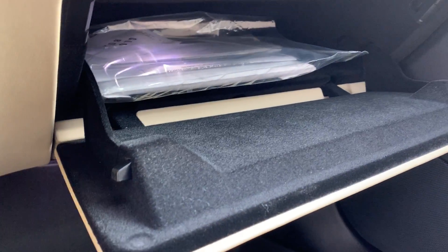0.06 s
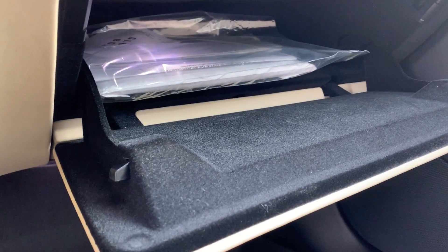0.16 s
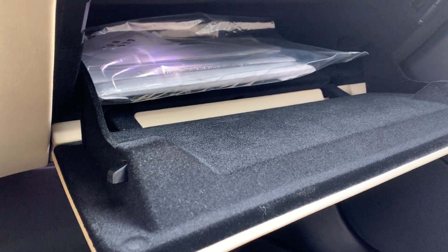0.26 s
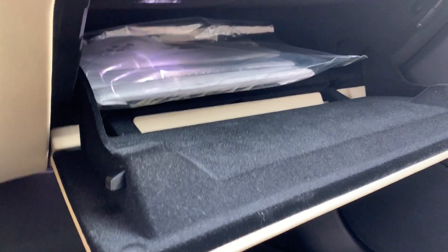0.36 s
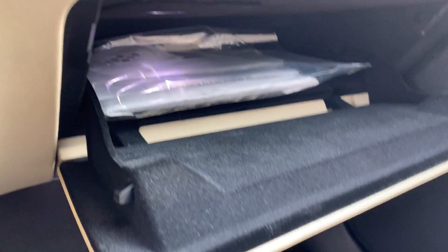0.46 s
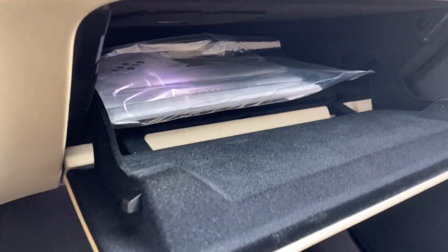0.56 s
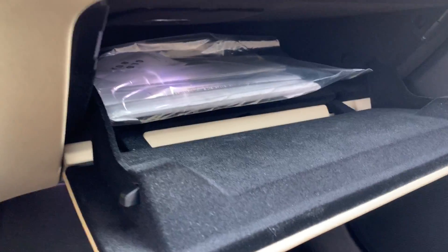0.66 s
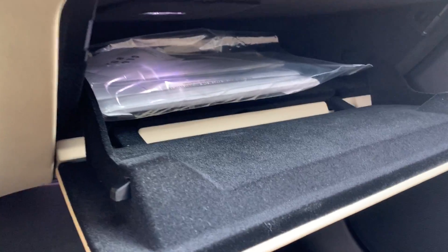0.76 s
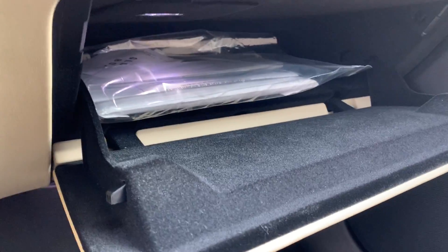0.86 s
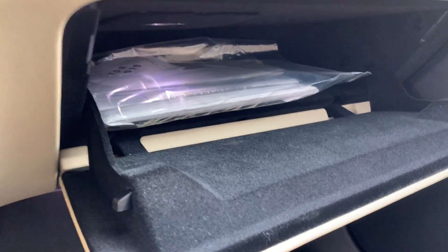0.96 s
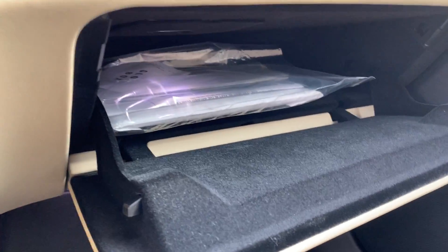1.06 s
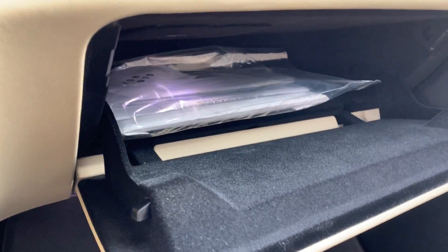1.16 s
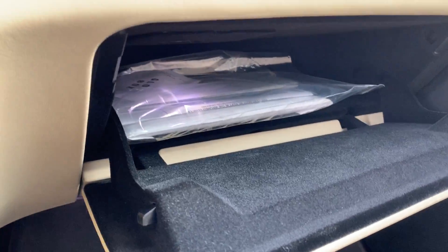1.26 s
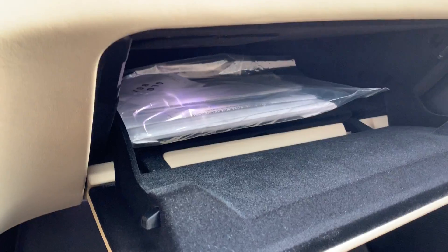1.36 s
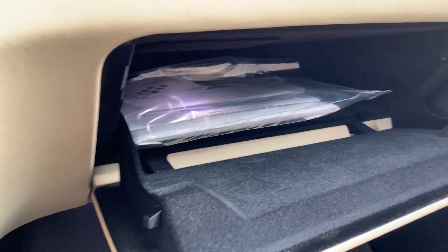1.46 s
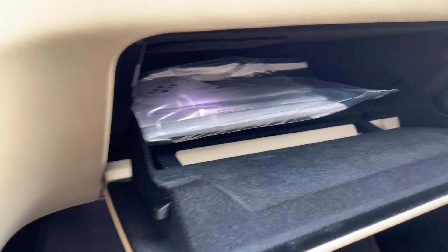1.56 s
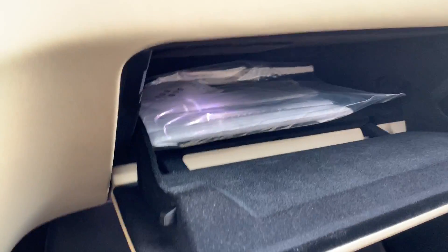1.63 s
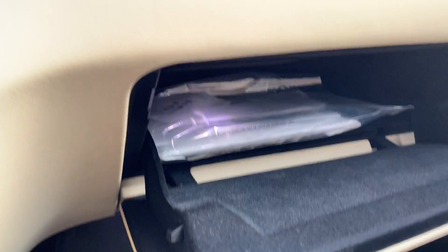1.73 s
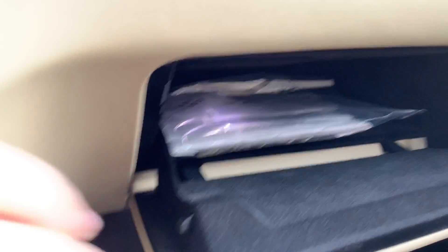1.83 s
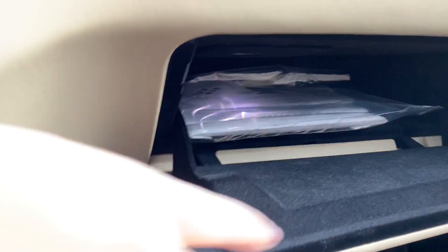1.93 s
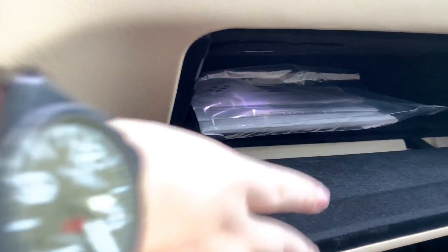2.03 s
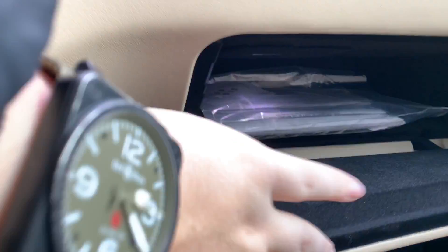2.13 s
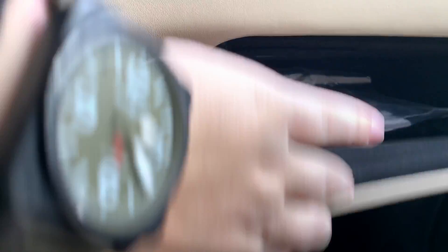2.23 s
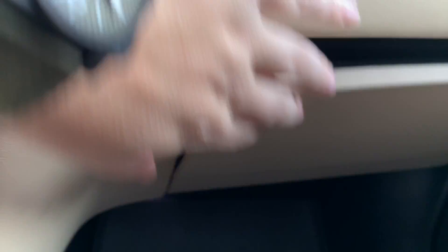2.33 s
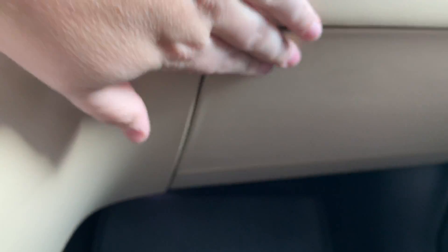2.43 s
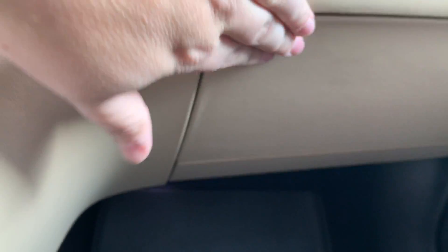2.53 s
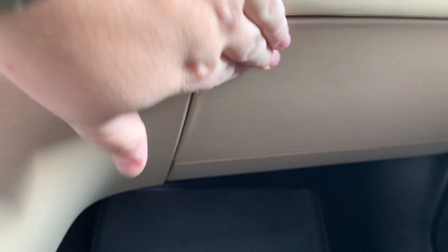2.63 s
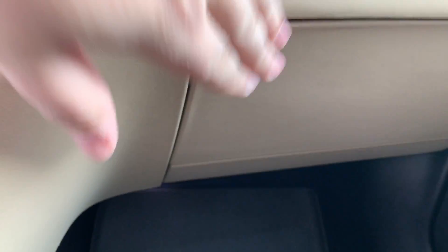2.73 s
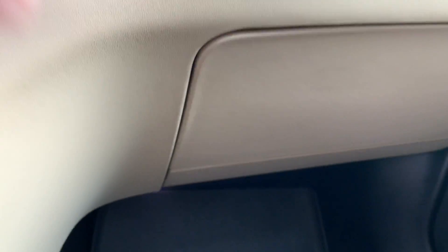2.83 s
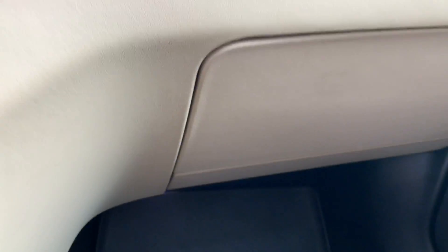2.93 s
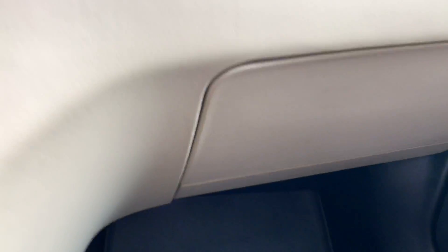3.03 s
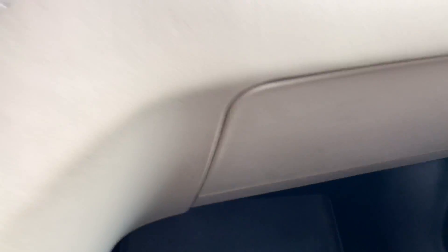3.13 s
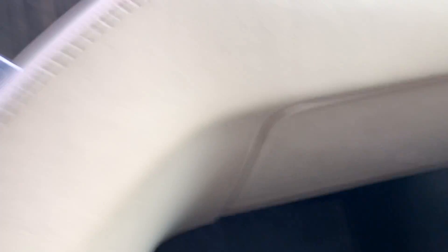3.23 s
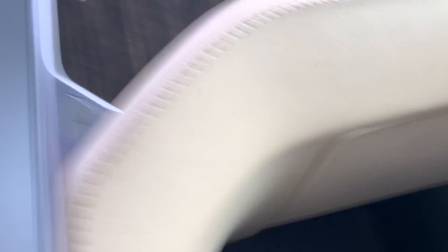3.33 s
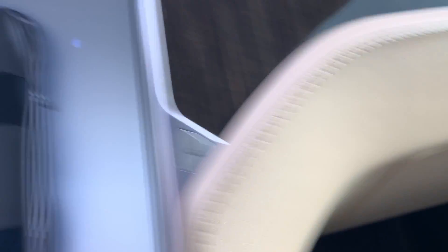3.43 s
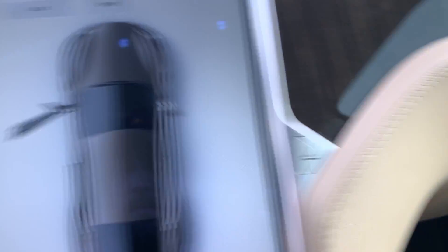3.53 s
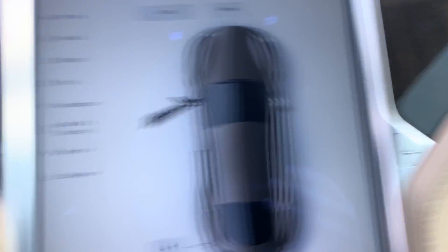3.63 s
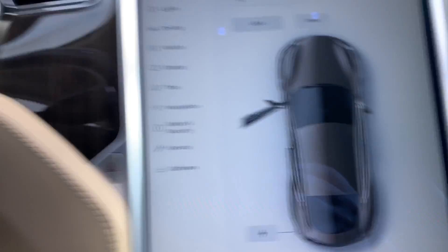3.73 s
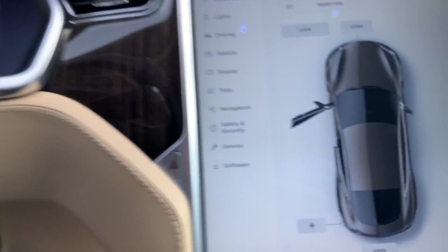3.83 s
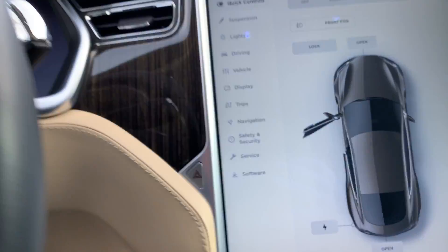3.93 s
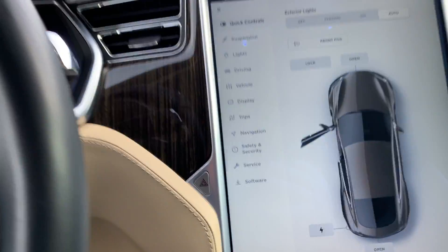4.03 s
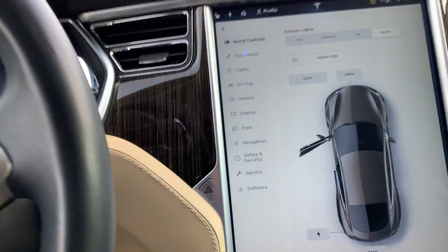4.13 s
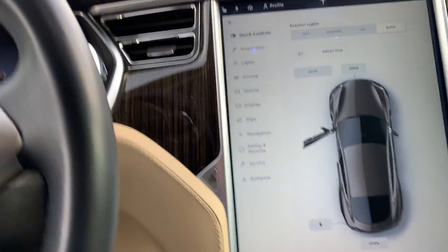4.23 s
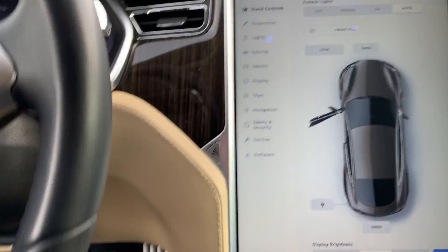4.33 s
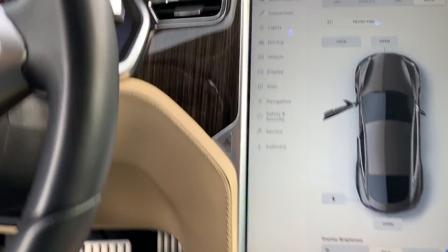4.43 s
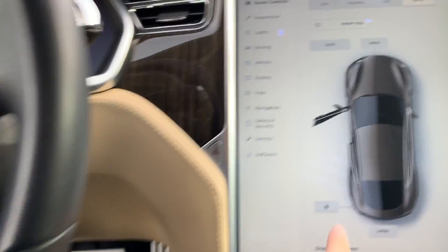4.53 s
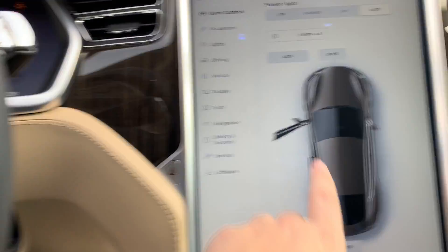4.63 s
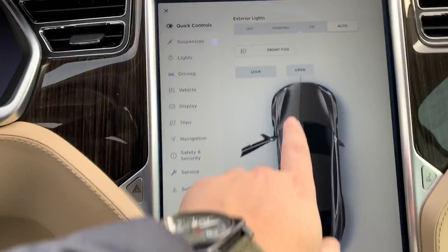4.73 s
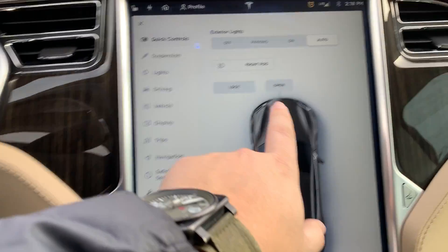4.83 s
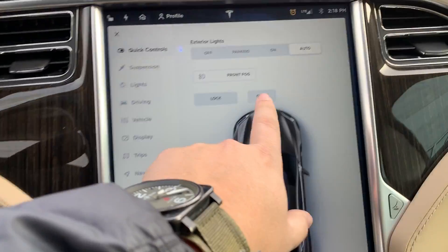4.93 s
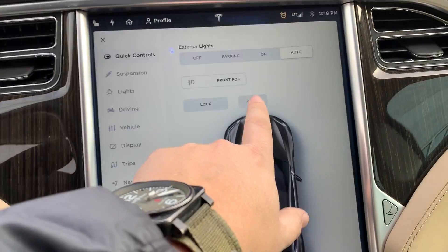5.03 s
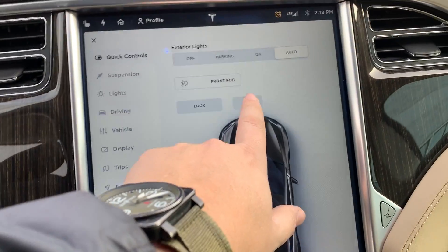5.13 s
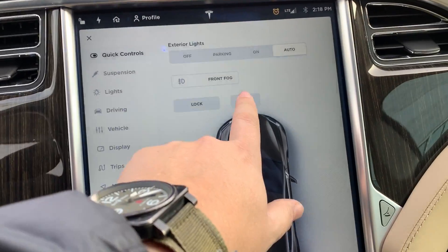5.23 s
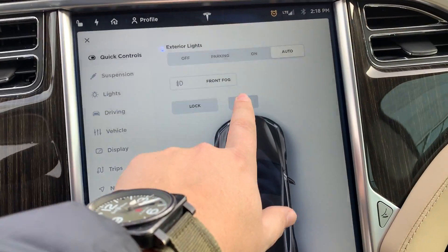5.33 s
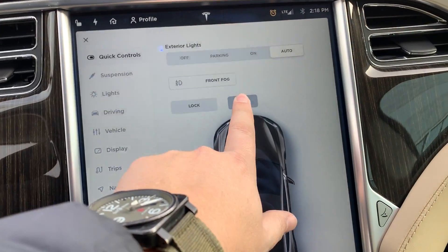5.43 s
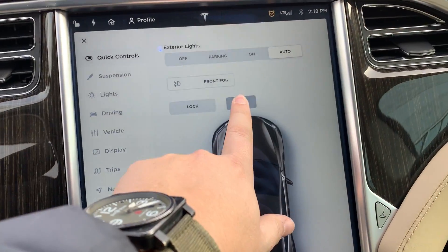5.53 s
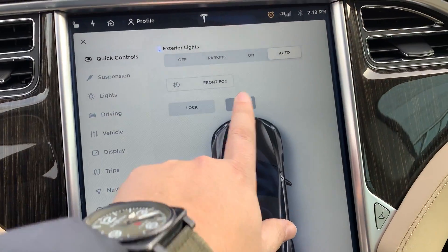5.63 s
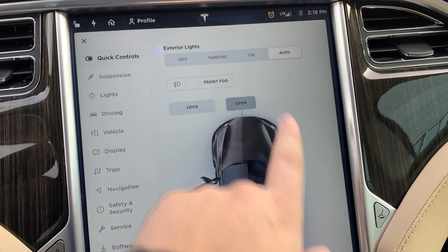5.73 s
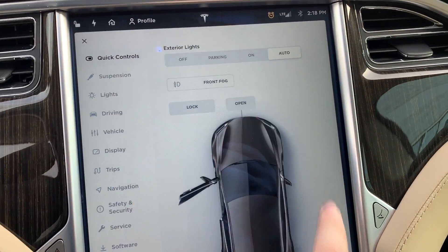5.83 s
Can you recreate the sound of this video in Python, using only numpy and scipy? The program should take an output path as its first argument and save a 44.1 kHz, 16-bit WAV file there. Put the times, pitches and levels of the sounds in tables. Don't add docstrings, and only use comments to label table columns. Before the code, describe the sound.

In a parked car, a faint low rumble and soft nylon sleeve rustles lead to a glovebox lid slamming and latching, then more cloth movement.

```python
import sys
import numpy as np
from scipy import signal
from scipy.fft import rfft, irfft
from scipy.io import wavfile
from scipy.ndimage import uniform_filter1d

SR = 44100
rng = np.random.default_rng(int(sys.argv[2]) if len(sys.argv) > 2 else 0)


def makeup_ratio(level_db):
    decades = np.asarray(level_db, float) / 20
    return 10 ** decades


def file_out(sig):
    cols = np.atleast_2d(sig).T
    lim = np.clip(cols, -1, 1)
    pcm = np.round(lim * 32767).astype(np.int16)
    wavfile.write(sys.argv[1], SR, pcm)


N = 259308
T = np.arange(N) / SR
HZ = np.fft.rfftfreq(N, 1 / SR)


def rms_one(x):
    return x / np.sqrt(np.mean(x ** 2) + 1e-20)


def at_hz(points, hz, column=1):
    p = np.array(points, float)
    return np.interp(np.log(hz + 1), np.log(p[:, 0]), p[:, column])


def colour(x, spectrum, size=16384):
    gain = rms_one(makeup_ratio(at_hz(spectrum, np.fft.rfftfreq(size, 1 / SR))))
    cepstrum = irfft(np.log(gain))
    cepstrum[1:size // 2] *= 2
    cepstrum[size // 2 + 1:] = 0
    response = irfft(np.exp(rfft(cepstrum)))
    return signal.fftconvolve(x, response[None], axes=1)[:, :N]


def cut(x, hz, kind, order=2):
    return signal.sosfilt(signal.butter(order, hz, kind, fs=SR, output="sos"), x)


def resonate(x, hz, width_hz):
    r = np.exp(-np.pi * width_hz / SR)
    poles = [1, -2 * r * np.cos(2 * np.pi * hz / SR), r * r]
    return signal.lfilter(np.array([1, 0, -1]) * (1 - r * r) / 2, poles, x)


def drift(rate):
    r = np.exp(-80 * np.pi * rate / SR)
    slow = signal.lfilter([1], [1, -2 * r, r * r], rng.standard_normal(N // 40 + 2002))[2000:]
    return np.interp(np.arange(N) / 40, np.arange(len(slow)), rms_one(slow))


def grains(per_s, spread_db):
    happens = rng.random(N) < per_s / SR
    sizes = makeup_ratio(spread_db * np.minimum(rng.exponential(1, N), 5)) * happens
    smear = signal.lfilter([1], [1, -.9], sizes)
    return rms_one(smear * rng.standard_normal((2, N)))


def burst(t, db, rise, t60):
    fall = makeup_ratio(db - 60 * np.clip(t - rise, 0, 3) / t60)
    return fall * np.clip(t / max(rise, 1e-4), 0, 1)


def rattle(contacts, spectrum, peaks, per_s, top_faster):
    clicks = grains(per_s, spread_db=1.6)
    power = sum(burst(T - s, db, rise, t60) ** 2 for s, db, rise, t60 in contacts)
    top_power = sum(burst(T - s, db, rise, t60 / top_faster) ** 2 for s, db, rise, t60 in contacts)
    force = cut(clicks * np.sqrt(power), 6600, "low") - cut(clicks * np.sqrt(top_power), 6700, "high")
    body = force + sum(1.13 * makeup_ratio(db) * resonate(force, hz, width) for hz, width, db in peaks)
    shared, own = colour(body, spectrum)
    lean = .4 * resonate(shared, 1300, 1200) - .5 * resonate(shared, 5200, 2500)
    differing = 1.2 * cut(cut(own, 1100, "high"), 7200, "low", order=4)
    return np.array([shared, differing + lean])


def lid_on_stops():
    # start in seconds, level in dB, rise in seconds, 60 dB decay in seconds
    contacts = [
        (2.365, -45.5, .02, 0.2),
        (2.397, -36, .002, .05),
        (2.4045, -14.5, .0006, 0.059),
        (2.411, -14, 0.0018, 0.098),
        (2.418, -19, .002, 0.09),
        (2.427, -24, .002, 0.068),
        (2.44, -38, .003, 0.076),
        (2.625, -55, .012, 0.14),
    ]
    # frequency in Hz, level in dB per Hz
    spectrum = [(200, -21), (350, 0.5), (600, -5), (760, -11.5), (1050, 1), (1400, -5), (2200, 0),
                (3000, -12), (5000, -13), (6800, -14), (9000, -17.5), (12000, -16.5), (15500, -35.5)]
    # frequency in Hz, width in Hz, level in dB
    peaks = [(556, 170, -0.5), (845, 60, 2.5), (1640, 80, -3), (3870, 150, -5), (6400, 500, -2)]
    return rattle(contacts, spectrum, peaks, 9000, top_faster=1.6)


def latch_snap():
    # start in seconds, level in dB, rise in seconds, 60 dB decay in seconds
    contacts = [
        (2.4545, -20, .001, .05),
        (2.4565, -15, 0.00066, .07),
        (2.4605, -8.5, .005, 0.065),
        (2.472, -21, .002, .04),
        (2.481, -38, .002, .09),
        (2.5, -52, .01, 0.27),
    ]
    # frequency in Hz, level in dB per Hz
    spectrum = [(200, -28), (380, -6), (680, -12.5), (850, -3), (1300, -8), (2000, -5.5), (3000, -9.5),
                (4500, -11.5), (6500, -14.5), (8000, -17), (10000, -16), (13000, -33), (15500, -33)]
    # frequency in Hz, width in Hz, level in dB
    peaks = [(840, 77, -6.5), (1940, 86, -4.5), (2136, 60, 4.5), (2980, 90, -4), (4380, 150, -4),
             (5140, 120, 0.5), (5850, 140, 1), (6730, 120, -3)]
    return rattle(contacts, spectrum, peaks, 12000, top_faster=2.2)


def thud():
    # start in seconds, level in dB, frequency in Hz, rise in seconds, 60 dB decay in seconds
    panel_modes = [(2.19, -35.5, 324, 0.0042, 0.1), (2.193, -43, 624, .003, 0.045),
                   (2.4045, -6.5, 604, 0.0012, 0.04), (2.4042, -15, 845, .001, 0.1),
                   (2.4044, -12.5, 279, .004, 0.051), (2.4047, -10, 497, 0.0033, 0.068),
                   (2.405, -10.5, 344, 0.0034, 0.06), (2.405, -9.5, 205, 0.005, 0.083),
                   (2.412, -12, 113.2, 0.01, .12), (2.419, -24, 71.9, .015, .12),
                   (2.42, -24, 571, .003, .08), (2.457, -20.5, 505.7, 0.0033, 0.09),
                   (2.461, -18, 105.1, .01, .07), (2.458, -24, 180, 0.0065, .07),
                   (2.466, -12, 366, 0.0063, 0.037), (2.497, -26.5, 93.4, 0.0095, .12),
                   (2.534, -28.5, 46, .015, .4), (2.609, -23, 42, 0.023, .4)]
    return sum(burst(T - s, db, rise, t60) * np.sin(2 * np.pi * hz * (T - s))
               for s, db, hz, rise, t60 in panel_modes)


def spring():
    # frequency in Hz, level in dB, 60 dB decay in seconds
    spring_modes = [(269.2, -45, 9.0), (538.3, -58, 2.1), (598, -52, 1.1), (1071, -43, .75),
                    (2180, -48, .85), (2541, -58, .45), (3768, -52, .6), (3950, -46, .35), (4215, -57, .6),
                    (4527, -60, .7), (4743, -55, 1.5), (5599, -67, 1.5), (6266, -63, .9), (6370, -58, 1.3),
                    (6444, -62, 1.1), (6525, -53, .9)]
    # frequency in Hz, level in dB, 60 dB decay in seconds
    rod_modes = [(802, -48.5, 1.3), (813, -56, .9), (830, -51, .3), (1836, -54, .35), (3790, -58, .3)]
    snap_s, settle_s = 2.465, 2.6
    out = np.zeros((2, N))
    for s, modes in ((snap_s, spring_modes), (settle_s, rod_modes)):
        start = round(s * SR)
        t = T[:N - start]
        for hz, db, t60 in modes:
            swing = burst(t, db, 0.0082, t60) * makeup_ratio(2.2 * drift(10)[start:])
            tone = np.sin(2 * np.pi * (hz * t + rng.random((2, 1))))
            out[:, start:] += swing * tone * [[1], [.2]]
    return out


def arm():
    # start in seconds, end in seconds, folds in dB, weave in dB
    held_out = [
        (0.475, 2.42, -62.5, -72),
        (2.5, 5.044, -63, -79),
        (5.69, 6.0, -63.5, -71.5),
    ]
    # fastest moment in seconds, half length in seconds, folds in dB,
    # weave over folds in dB
    strokes = [(0.0, .015, -71, -7), (0.45, .035, -73, -15), (0.525, .025, -61.5, -10),
               (0.582, .05, -66, -3), (0.911, 0.12, -61, -1), (1.24, 0.12, -63.5, -9),
               (1.42, .13, -59.5, -4.5), (1.703, .06, -57.5, -11), (1.88, .13, -50, -10),
               (2.068, .08, -57.5, -9), (2.3, .05, -63.5, 1), (2.385, .05, -51, -8.5),
               (2.53, .025, -58, -16), (2.648, .025, -70, 12), (2.69, .035, -59.5, -15),
               (2.94, .08, -61, -12), (3.321, 0.074, -60.5, -16), (3.581, .11, -58, -1.5),
               (3.687, .055, -58, 4.5), (4.023, 0.065, -54.5, 2), (4.109, 0.075, -54, 4),
               (4.298, 0.15, -54, 0.5), (4.569, 0.088, -57, 0), (4.731, 0.12, -52.5, -3.5),
               (4.977, .08, -60.5, -3.5), (4.04, .025, -56, -2), (5.445, 0.032, -72.5, -20),
               (5.779, .05, -63, -1)]
    lift_s, rest_db_per_s = .03, 55
    folds_drop_db, weave_drop_db = 5.0, 7.5
    folds, weave = makeup_ratio(2 * -85.5), makeup_ratio(2 * -92)
    for start, end, folds_db, weave_db in held_out:
        out = np.clip((T - start) / lift_s, 0, 1) ** 2
        out = out * makeup_ratio(-2 * rest_db_per_s * np.clip(T - end, 0, 2))
        folds = folds + makeup_ratio(2 * folds_db) * out
        weave = weave + makeup_ratio(2 * weave_db) * out
    for s, half, db, over_db in strokes:
        away = 2.21 * np.log(1 + .6 * ((T - s) / half) ** 2)
        folds = folds + makeup_ratio(2 * (db - folds_drop_db * away))
        weave = weave + makeup_ratio(2 * (db + over_db - weave_drop_db * away))
    return np.sqrt(folds), np.sqrt(weave)


def patches(x, depth_db, width_bins, length_frames):
    z = signal.stft(x, nperseg=512)[2]
    field = uniform_filter1d(rng.standard_normal(z.shape[1:]), max(int(width_bins), 1), axis=0)
    field = rms_one(uniform_filter1d(field, max(int(length_frames), 1), axis=1))
    return signal.istft(z * makeup_ratio(depth_db * field), nperseg=512)[1][:, :N]


def sleeve():
    # frequency in Hz, level in dB per Hz
    folds_spectrum = [(410, -29), (700, -5), (767, -11), (885, -6.5), (1230, -5), (1330, -7), (2430, -8),
                      (4080, -12), (8000, -21.5), (10400, -49), (17600, -120)]
    # frequency in Hz, level in dB per Hz
    weave_spectrum = [(2350, -36), (4000, -5), (5210, -3), (6090, -5.5), (7930, -3), (9690, 1), (10600, -3),
                      (14500, -5.5), (15800, -9.5)]
    folds_gain, weave_gain = arm()
    flutter = .8 * drift(16)
    folds = colour(grains(9000, spread_db=-1.5), folds_spectrum)
    folds = folds * folds_gain * makeup_ratio(3.0 + flutter + 0.58 * drift(25))
    weave = colour(grains(12000, spread_db=1.0), weave_spectrum)
    weave = weave * weave_gain * makeup_ratio(5.0 + flutter)
    return patches(folds + weave, 2.0, 3.9, 11)


def ticks():
    # start in seconds, peak in dB, centre in Hz, width as a share of the centre
    cracks = [(.16, -68, 9000, 1.1), (0.267, -67, 7000, 1.1), (.41, -50, 1500, 1.3),
              (0.458, -46, 2100, 0.73), (0.4903, -27, 955, 0.39), (0.4904, -33, 1830, 0.33),
              (.491, -35.5, 2720, 0.76), (0.491, -40, 5000, 1.2), (0.6472, -41, 2100, 1.1),
              (0.701, -44, 4000, .6), (.93, -41, 2500, 1.1), (1.4616, -40, 3200, 0.78),
              (1.513, -35, 2400, 0.55), (1.524, -45, 2350, .5), (1.536, -46, 2300, 0.56),
              (1.7996, -32.5, 3400, 0.68), (2.0727, -36, 2300, 1.4), (2.1191, -43, 1900, .4),
              (2.1857, -31, 1100, 0.6), (2.7694, -45.5, 2500, .9), (2.905, -40.5, 3400, 0.4),
              (2.933, -43, 2500, 0.81), (3.05, -50, 3720, 0.34), (3.3, -55.5, 6680, .08),
              (3.6794, -32, 980, 0.35), (3.797, -38, 2464, 1.04), (5.4344, -62.5, 5000, 1.8),
              (5.499, -67, 4530, 1.14), (5.7592, -37.5, 1300, 1.2)]
    length = SR // 9
    out = np.zeros((2, N))
    for s, db, hz, width in cracks:
        t60 = .047 / width ** 0.41
        crack = rng.standard_normal((2, length)) * burst(T[:length], db + 2, 0.00027, t60) / np.sqrt(width)
        start = round(s * SR)
        out[:, start:start + length] += resonate(resonate(crack, hz, width * hz), hz, width * hz)
    return out


def cabin():
    # frequency in Hz, level in dB per Hz
    rumble_spectrum = [(12, -63), (20, -28), (24, -27.5), (35, -11.5), (59, 2), (102, -4.5), (130, -15.5),
                       (160, -18), (210, -42.5), (350, -120)]
    # frequency in Hz, level in dB per Hz
    hum_spectrum = [(110, -34), (140, -1), (200, -0.5), (290, -10.5), (400, -7.5), (600, -13), (750, -12.5),
                    (1100, -19.5), (1600, -22.5), (2300, -33.5), (3200, -49.5), (5000, -65), (9000, -50.5),
                    (15500, -72.5)]
    # time in seconds, place from 0 at the glovebox to 1 in the open cabin
    place_curve = [
        (0.0, -0.015),
        (0.8, -0.063),
        (1.5, 0.17),
        (2.3, 0.4),
        (3.1, 0.3),
        (3.65, 0.85),
        (4.1, 0.98),
        (5.15, 1.0),
        (5.5, 0.67),
        (5.88, 1.0),
    ]
    # start in seconds, rumble in dB, rise in seconds,
    # 60 dB decay in seconds
    shake_s, shake_db, shake_rise, shake_t60 = (2.5, -46, 0.16, 1.2)
    rumble_db, hum_db, boom_db = -41.5, -57, -59
    place = np.interp(T, *np.transpose(place_curve))

    rumble = colour(rng.standard_normal((2, N)), rumble_spectrum)
    rumble = rumble * makeup_ratio(rumble_db - 0.9 * place + 2.5 + 1.4 * drift(6.3))
    gusts = makeup_ratio(1.06 * drift(1.5))
    rumble = rumble * (gusts + burst(T - shake_s, shake_db - rumble_db, shake_rise, shake_t60))

    hum = colour(rng.standard_normal((2, N)), hum_spectrum)
    hum = hum * makeup_ratio(hum_db + 0.2 * place + 7.0 + 1.2 * drift(20))

    boom = resonate(resonate(rng.standard_normal((2, N)), 280, 160), 280, 160)
    boom = rms_one(boom) * makeup_ratio(boom_db + 10.5 * place - 1.0)
    return rumble + hum + boom


def reflections(x, wet_db, t60):
    length = SR // 8
    echoes = rng.standard_normal((2, length)) * burst(T[:length] - .002, 0, 0.003, t60)
    echoes *= makeup_ratio(wet_db) / np.sqrt(np.sum(echoes ** 2, axis=1, keepdims=True))
    return x + signal.fftconvolve(cut(x, 460, "high"), echoes, axes=1)[:, :N]


def scene():
    slam = lid_on_stops() + latch_snap() + thud() * [[1], [0]] + makeup_ratio(2.0) * spring()
    return slam + reflections(sleeve() + ticks() + cabin(), wet_db=-11, t60=.1)


def band_limit(x):
    return signal.sosfilt(signal.butter(12, 15700, fs=SR, output="sos"), x)


def record(dry):
    # frequency in Hz, likeness from 0 to 1, left over right in dB
    ports = [(40, .985, .3), (120, .96, 1.0), (250, .92, 2.5), (700, .55, 3.2), (1500, .35, .5),
             (5000, .35, -1.1), (7000, .6, -1.1), (8000, .85, 0), (9300, .87, 0), (10800, .99, 0),
             (16000, .995, 0)]
    # frequency in Hz, lead of the right port in radians
    port_phase = [(0, 0), (500, -.4), (1700, -3.14), (3400, -9.4), (4200, -13.4), (5400, -9.6),
                  (6450, -12.8), (8300, -9.65), (9000, -9.15), (10900, -6.35), (11300, -6.2),
                  (13050, -3.45), (13700, -2.9), (15650, 0)]
    shared, own = rfft(dry)
    alike = np.clip(at_hz(ports, HZ), 0, 1)
    pan = makeup_ratio(at_hz(ports, HZ, column=2) / 2)
    lead = np.interp(HZ, *np.transpose(port_phase))
    same = np.sqrt((1 + alike) / 2) * shared
    other = np.sqrt((1 - alike) / 2) * own
    left = (same + other) * pan
    right = (same - other) / pan * np.exp(1j * lead)
    mix = np.clip(irfft(np.array([left, right]), N), -1, 1)
    return band_limit(mix)


dry = scene()
out = record(dry)
file_out(out)
```